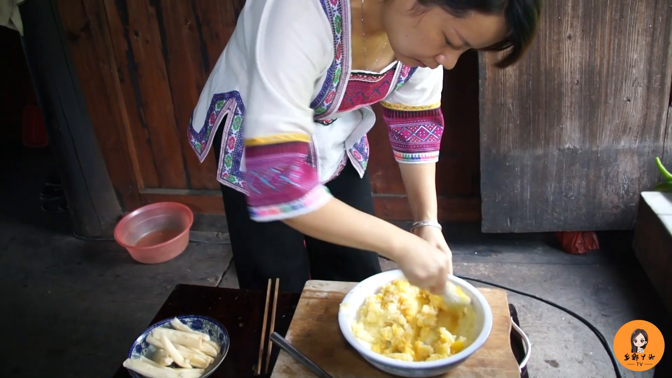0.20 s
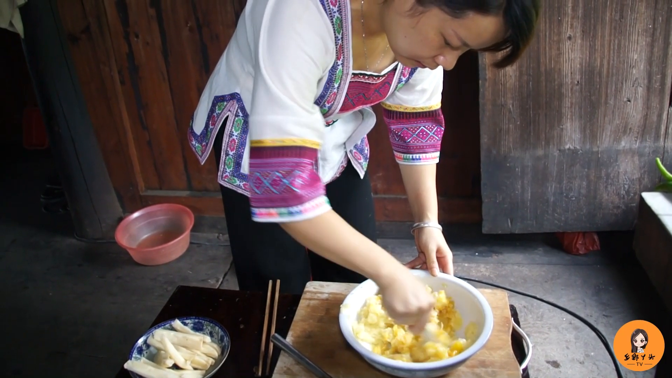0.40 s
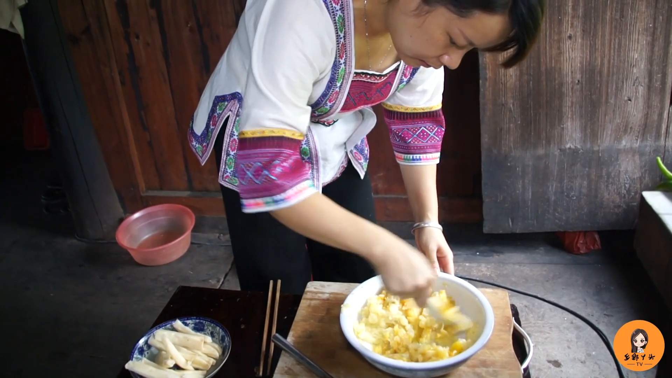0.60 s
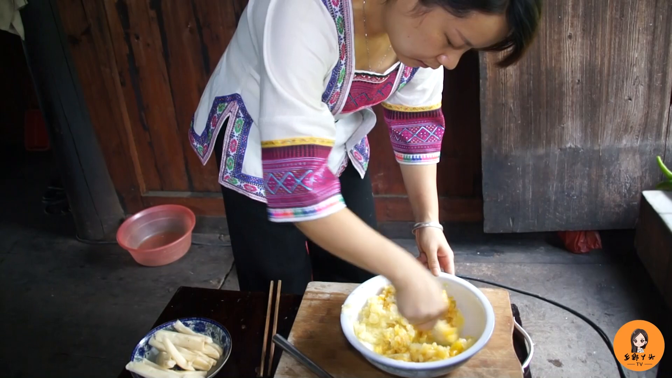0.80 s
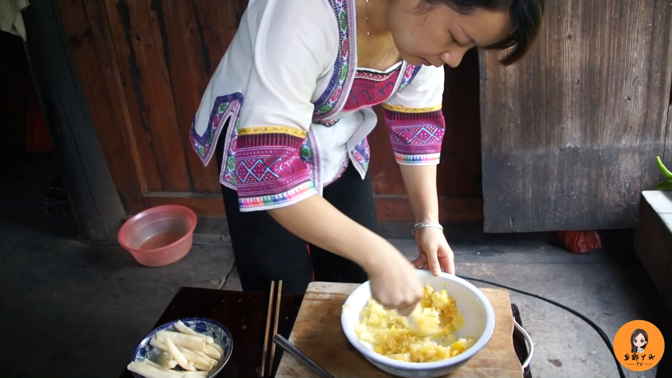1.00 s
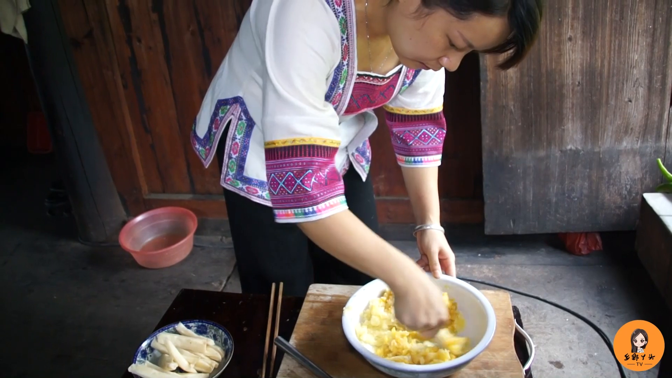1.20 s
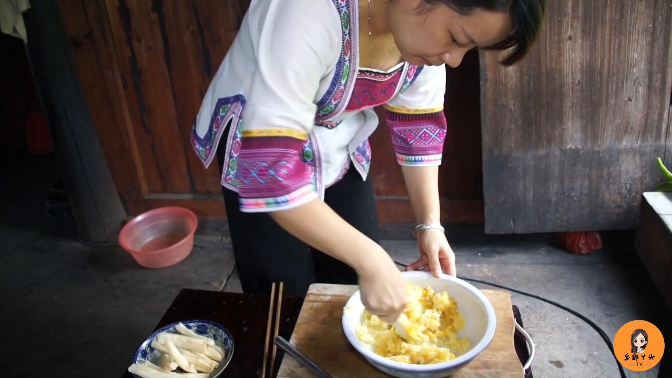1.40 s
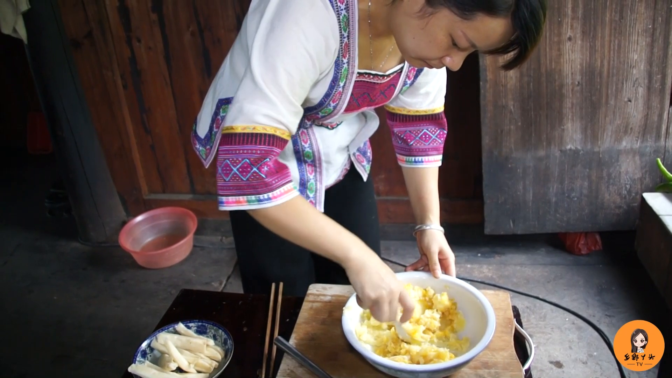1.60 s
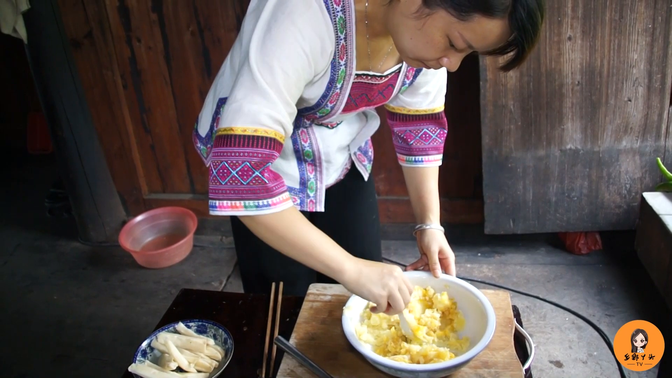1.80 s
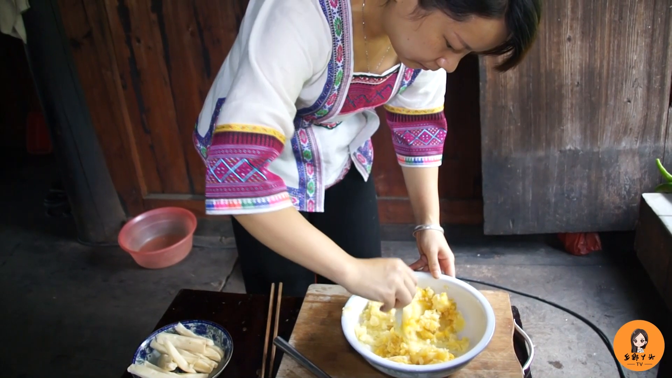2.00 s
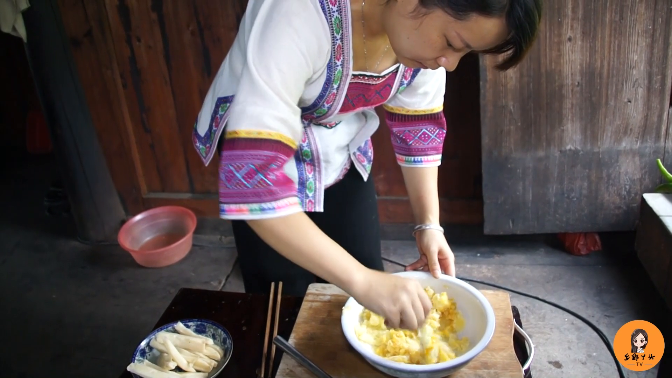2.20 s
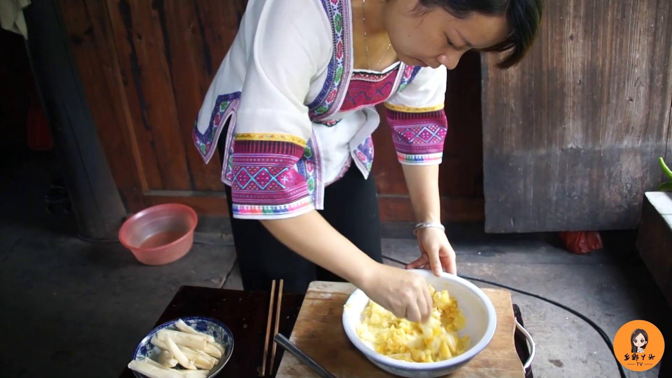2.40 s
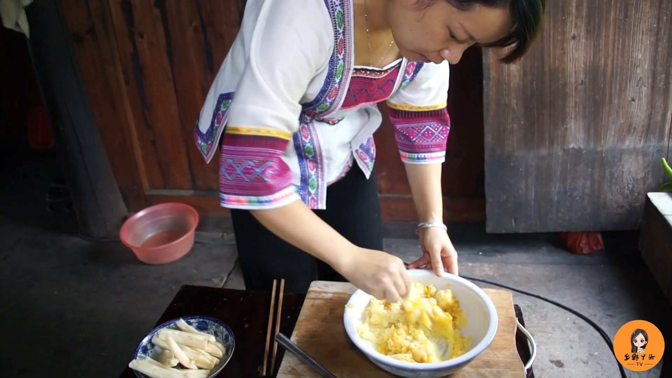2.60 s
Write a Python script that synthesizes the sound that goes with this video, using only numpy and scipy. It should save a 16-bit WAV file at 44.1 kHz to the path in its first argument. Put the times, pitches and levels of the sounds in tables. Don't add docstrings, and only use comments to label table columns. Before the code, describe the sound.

A metal spoon knocks an enamel bowl three times, ringing briefly, with soft scrapes and taps between.

```python
import sys
import numpy as np
from scipy import signal
from scipy.fft import rfft, irfft
from scipy.io import wavfile
from scipy.ndimage import uniform_filter1d

SR = 44100
rng = np.random.default_rng(int(sys.argv[2]) if len(sys.argv) > 2 else 0)


def decibels_to_gain(level_db):
    exponent = np.asarray(level_db, float) / 20
    return 10 ** exponent


def persist_wave(psi):
    counts = np.round(np.clip(psi, -1, 1) * 32767).astype(np.int16)
    wavfile.write(sys.argv[1], SR, np.atleast_2d(counts).T)


N = 114660
LEAD = SR // 4


def read(points, hz):
    f, value = np.transpose(points)
    return np.interp(np.log(hz + 1), np.log(f + 1), value)


def evened(x):
    return x / np.sqrt(np.mean(x ** 2) + 1e-20)


def add(mix, start_s, sound):
    part = mix[..., round(start_s * SR) + LEAD:][..., :sound.shape[-1]]
    part += sound[..., :part.shape[-1]]


def colour(x, db_of):
    hz = abs(np.fft.fftfreq(4096, 1 / SR))
    log_gain = np.log(decibels_to_gain(np.maximum(db_of(hz), -100)))
    min_phase = -signal.hilbert(log_gain).imag
    taps = np.fft.ifft(np.exp(log_gain + 1j * min_phase)).real[:2048]
    return signal.oaconvolve(np.atleast_2d(x), taps[None], axes=1)[:, :x.shape[-1]]


def bump(start_s, level_db, t60_s, dull_hz, weight_db):
    # f/Hz, gain/dB
    body_gain = [(100, -32), (200, -12.5), (430, -7), (900, 1), (2000, -3.5), (4500, -4.5), (8500, -13.5),
                 (12000, -35.5)]
    push_db = -12
    t = np.arange(SR // 5) / SR
    fade = decibels_to_gain(-60 * t / t60_s) * np.minimum(t / 0.0013, 1)
    z = rfft(rng.standard_normal(len(t)) * fade)
    rattle = irfft(z / abs(z)) * np.sqrt(fade)
    burst = rattle / np.linalg.norm(rattle) + decibels_to_gain(push_db) * (t == 0)

    def gain_db(hz):
        dulling_db = 10 * np.log10(1 + (hz / dull_hz) ** 6)
        bass_db = weight_db / (1 + (hz / 550) ** 4)
        return read(body_gain, hz) - dulling_db + bass_db

    body = colour(burst, gain_db)
    return start_s, decibels_to_gain(level_db + 16) * body / np.linalg.norm(body)


def room(x):
    # f/Hz, t60/s
    decay = [(150, 0.45), (500, 0.54), (1000, 0.48), (2000, .45), (4000, 0.42), (8000, 0.41), (14000, 0.15)]
    mono_hz = 700
    taps = np.zeros((2, SR))
    at = np.arange(120, SR - 20, 20) + rng.integers(0, 20, (2, (SR - 121) // 20))
    np.put_along_axis(taps, at, rng.choice([-1., 1.], at.shape), 1)
    hz, t, z = signal.stft(taps, SR, nperseg=256)
    apart = (1 / np.sqrt(1 + (mono_hz / (hz + 1)) ** 4))[:, None]
    z[1] = apart * z[1] + np.sqrt(1 - apart ** 2) * z[0]
    fade = decibels_to_gain(-60 * t / read(decay, hz)[:, None])
    tail = signal.istft(z * fade, SR, nperseg=256)[1]
    return signal.fftconvolve(x, tail / np.linalg.norm(tail[0]), axes=1)[:, :x.shape[1]]


def chirp(start_s, length_s, level_db, hz):
    t = np.arange(0, length_s, 1 / SR)
    swell = np.sin(np.pi * t / length_s) ** 0.6
    return start_s, decibels_to_gain(level_db) * np.sin(2 * np.pi * hz * t)[None] * swell


def wash():
    # f/Hz, correlation/1
    likeness = [(60, 0.17), (240, 0.21), (950, 0.23), (3770, 0.42), (15000, -0.0)]
    # f/Hz, level/dB
    spectrum = [(100, -23.5), (200, -5.5), (437, -2), (900, -2.2), (1800, -10.5), (2840, -8), (7060, -19.5),
                (13500, -30)]
    wash_db, top_hz, patch_db = -56, 13600, 1.1
    insect_db, insect_hz, insect_width_hz = -76.5, 7250, 330
    frames, hz = N // 256 + 5, np.fft.rfftfreq(1024, 1 / SR)
    a, b, c, d, patches = rng.standard_normal((frames, 513, 5)).T
    patches = uniform_filter1d(patches, size=12, axis=0)
    patches = evened(uniform_filter1d(patches, size=14, axis=1))
    same = np.clip(read(likeness, hz), -1, 1)[:, None]
    left = a + 1j * b
    right = same * left + np.sqrt(1 - same ** 2) * (c + 1j * d)
    z = np.array([left, right]) * decibels_to_gain(patch_db * patches)

    def band(gain):
        return evened(signal.istft(z * gain[:, None], nperseg=1024, noverlap=768)[1][:, :N])

    wide = band(decibels_to_gain(read(spectrum, hz)) * (hz < top_hz))
    insect = band(np.exp(-((hz - insect_hz) / insect_width_hz) ** 2))
    return decibels_to_gain(wash_db) * wide + decibels_to_gain(insect_db) * insect


def rumble():
    level_db, corner_hz = -81, 60
    noise = rng.standard_normal((2, N))
    return decibels_to_gain(level_db) * evened(colour(noise, lambda hz: -20 * np.log10(1 + (hz / corner_hz) ** 2)))


def scrape(start_s, length_s, level_db, centre_hz):
    slips_per_s, width_octaves = 5000, 0.45
    t = np.arange(SR // 5) / SR
    slips = rng.standard_normal(len(t)) * (rng.random(len(t)) < slips_per_s / SR)
    band = colour(slips, lambda hz: -10 * (np.log2((hz + 1) / centre_hz) / width_octaves) ** 2)
    swell = np.sin(np.pi * np.minimum(t / length_s, 1) ** .7) ** 2
    return start_s, decibels_to_gain(level_db) * evened(band) * swell


def knock(place, start_s, ring_db, tick_db, clank_db, pan_db):
    # f/Hz, t60/s, level/dB at the place of knock 1, 2, 3
    rim_modes = [(1036, 0.016, -2.5, -1, -27.5), (1573, 0.064, -15, -14.5, -4),
                 (1649, 0.03, -5.5, -11, -30), (2000, 0.02, -9.5, -8, -19), (2900, 0.11, -6, -3.5, -2),
                 (2973, .07, -2, -1.5, -2.5), (4100, 0.034, -9, -14, -7.5), (4480, .05, -4, -7, -6),
                 (4596, 0.087, -3, -9.5, 2), (437, 0.056, -24, -24.5, -16), (6493, 0.062, -11.5, -13.5, -7),
                 (8690, 0.064, -15.5, -27, -20.5), (9850, .04, -27, -42, -35), (10760, .04, -35, -40, -24)]
    split, twin_db, port_lag_s = 0.0075, -4.5, .00007
    t, out = np.arange(SR // 3) / SR, 0
    lagged = t - port_lag_s * np.array([[1], [0]])
    for hz, t60_s, *place_db in rim_modes:
        for f, db in ((hz, 0), (hz * (1 - split), twin_db)):
            phase = 2 * np.pi * f * lagged + rng.normal(0, 0.23, (2, 1))
            out = out + decibels_to_gain(ring_db + db + place_db[place] - 60 * t / t60_s) * np.sin(phase)
    return start_s, out * np.minimum(t / 0.0011, 1) * decibels_to_gain(pan_db * np.array([[.5], [-.5]]))


def tick(start_s, ring_db, tick_db, clank_db, pan_db):
    # f/Hz, t60/s, level/dB
    tip_modes = [(1925, 0.013, -4.5), (3980, .012, 8), (5000, 0.045, -3.8)]
    t = np.arange(1500) / SR
    clank = 0
    for hz, t60_s, db in tip_modes:
        clank = clank + decibels_to_gain(clank_db + db - 60 * t / t60_s) * np.sin(2 * np.pi * hz * t)
    spark = decibels_to_gain(tick_db - 60 * t / .004) * rng.standard_normal((2, len(t))) * decibels_to_gain([[-4.5], [0]])
    return start_s + .0004, spark + clank * np.minimum(t / .0006, 1)


def scene():
    # t/s, level/dB, t60/s, dullness/Hz, weight below 500 Hz/dB
    bumps = [
        (-.15, -20.5, 0.048, 3950, -5.2),
        (.2068, -13.5, 0.029, 7000, -6),
        (0.685, -15.5, 0.015, 4980, -1),
        (0.8564, -22, 0.039, 1360, -6),
        (.8574, -24, 0.056, 10800, 5),
        (2.1888, -9, 0.043, 8750, 5),
        (2.453, -28, 0.035, 1404, 0.5),
    ]
    # t/s, length/s, level/dB, f/Hz
    chirps = [
        (-.04, 0.1, -56.5, 1809),
        (0.083, .105, -55, 1792),
        (.188, .02, -60, 5400),
    ]
    # t/s, length/s, level/dB, centre f/Hz
    scrapes = [
        (.005, 0.017, -52.5, 4560),
        (0.045, 0.023, -58, 3500),
        (0.484, 0.026, -51, 4800),
        (0.85, 0.056, -63, 8200),
        (1.91, 0.064, -63.5, 4455),
        (2.44, 0.067, -60, 6230),
        (2.492, 0.026, -51, 4170),
    ]
    # t/s, ring/dB, tick/dB, clank/dB, left-right/dB
    knocks = [
        (0.2065, -12.5, -22, -9, 0.4),
        (0.6839, -14, -53, -12.5, 0.7),
        (2.1880, -13, -30, -18, 0.56),
    ]
    # t/s, level/dB, t60/s, dullness/Hz, weight below 500 Hz/dB
    close_taps = [
        (0.8579, -16, 0.074, 5000, -2),
        (1.191, -49, .008, 9000, -10),
        (1.4517, -36.5, 0.012, 2900, 10.5),
        (1.4529, -38.5, 0.11, 800, 15),
        (1.594, -54, 0.0072, 6070, -5.5),
        (2.4525, -31, .05, 7000, -11),
    ]
    room_db = 4
    mix = np.zeros((2, N + LEAD))
    strokes = [bump(*row) for row in bumps] + [scrape(*row) for row in scrapes]
    strokes += [knock(place, *row) for place, row in enumerate(knocks)]
    for start_s, sound in strokes:
        sound = np.pad(sound * np.ones((2, 1)), ((0, 0), (0, SR // 2)))
        add(mix, start_s, sound + decibels_to_gain(room_db) * room(sound))
    dry_sounds = [chirp(*row) for row in chirps] + [tick(*row) for row in knocks]
    for start_s, sound in dry_sounds + [bump(*row) for row in close_taps]:
        add(mix, start_s, sound)
    return mix[:, LEAD:] + wash()


def roll_off(x):
    return signal.sosfilt(signal.butter(12, 16030, fs=SR, output="sos"), x)


def record(dry):
    # f/Hz, width/Hz, gain/dB
    dips = [(600, 52, -4.5), (1385, 139, -10.5), (2392, 180, -15.5), (3456, 320, -7.5), (6900, 250, -0.5)]
    low_cut_hz = 190
    bend = .004

    def body_db(hz):
        notch_db = sum(db * np.exp(-((hz - f) / w) ** 2) for f, w, db in dips)
        return notch_db - 20 * np.log10(1 + (low_cut_hz / (hz + 20)) ** 2)

    heard = colour(dry, body_db)
    return roll_off(np.clip(heard + bend * heard ** 2 + rumble(), -1, 1))


dry = scene()
out = record(dry)
persist_wave(out)
```